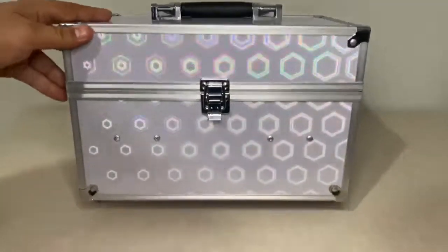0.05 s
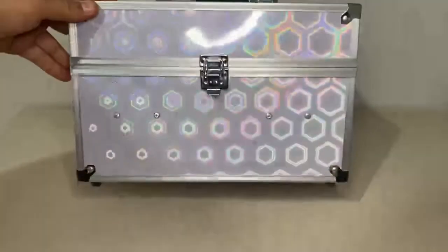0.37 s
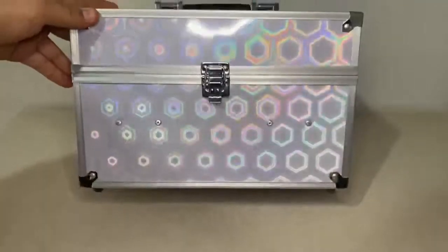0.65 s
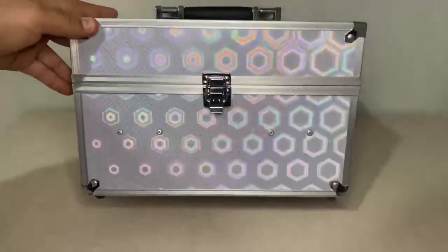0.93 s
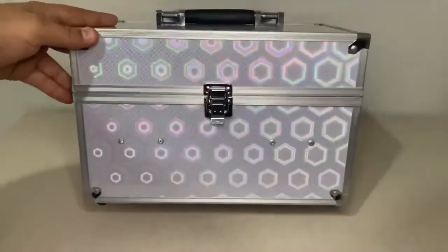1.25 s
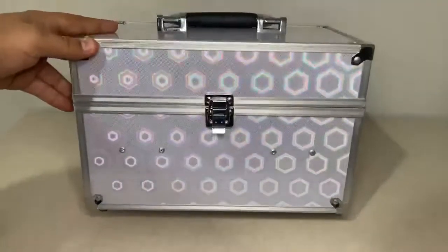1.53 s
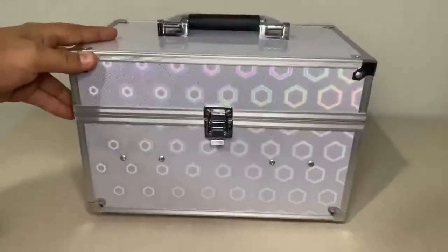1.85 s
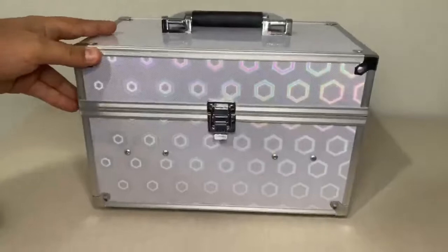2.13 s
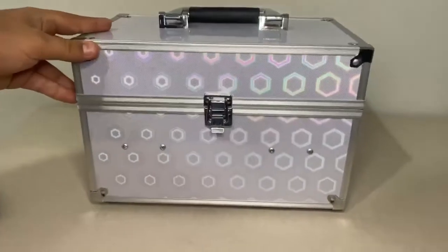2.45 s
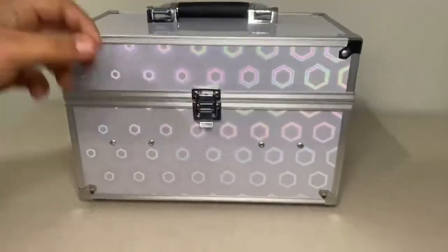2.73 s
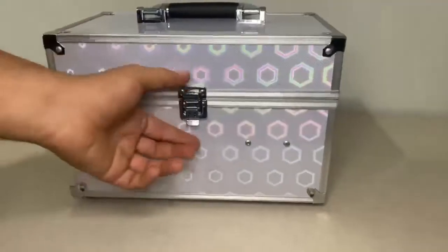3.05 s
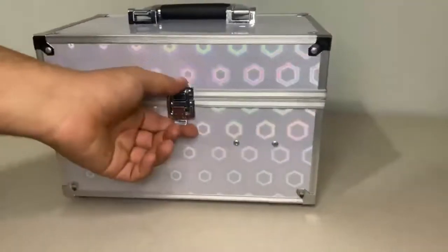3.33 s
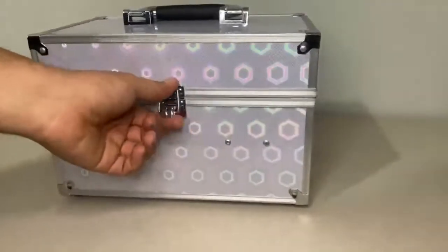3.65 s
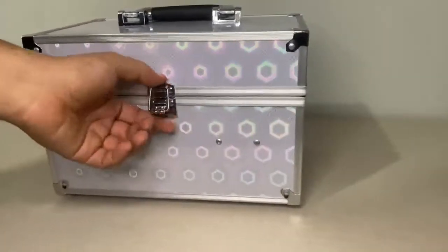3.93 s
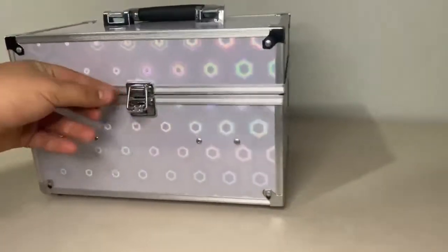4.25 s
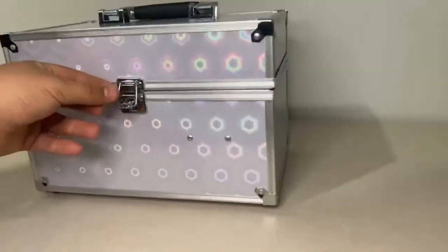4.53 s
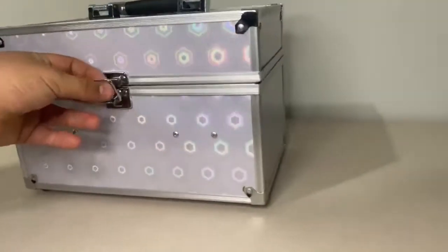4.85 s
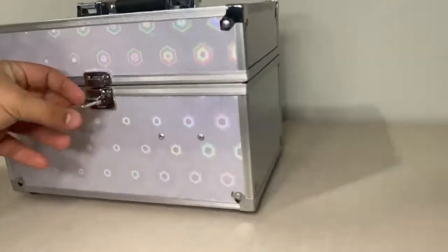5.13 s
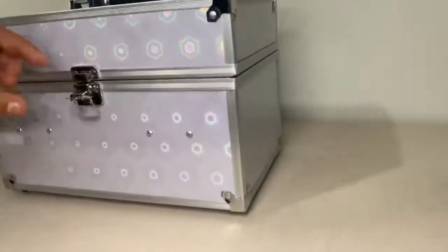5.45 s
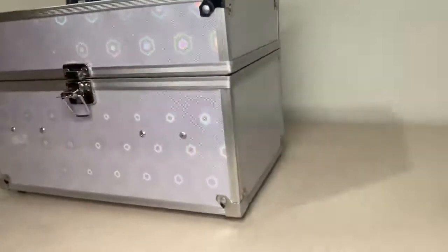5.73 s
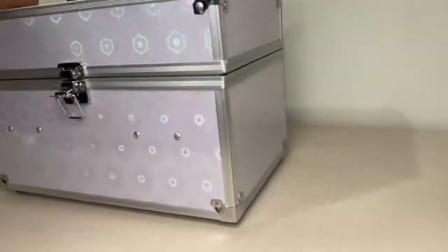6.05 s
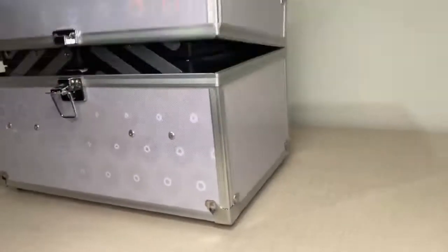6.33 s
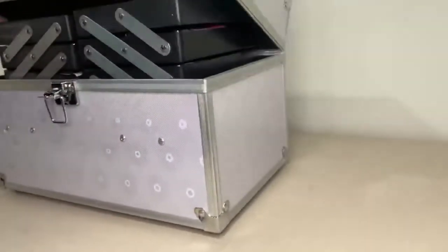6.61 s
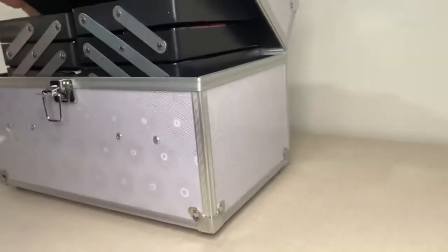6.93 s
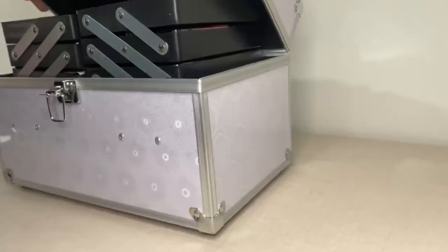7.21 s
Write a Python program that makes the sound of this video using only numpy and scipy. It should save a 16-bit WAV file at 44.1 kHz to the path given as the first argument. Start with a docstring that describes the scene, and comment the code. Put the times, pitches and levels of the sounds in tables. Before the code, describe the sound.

A metal-framed case thuds softly on a table, its steel clasp scrapes and snaps open, and the lid drags up.

```python
"""Opening a metal-framed case

In a small, quiet room an aluminium-framed case is tipped back onto a table with a hollow thud.
A hand rubs over it and pries up the steel clasp, whose hook grates, snaps free and chatters.
Then the lid drags up. Contacts ring the steel and the hollow box under it, and the walls echo.
A close pair of microphones listens, over a faint rumble and a low hum."""
import sys
import numpy as np
from scipy import signal
from scipy.fft import rfft, irfft, next_fast_len
from scipy.io import wavfile
from scipy.ndimage import uniform_filter1d

SR = 44100
rng = np.random.default_rng(int(sys.argv[2]) if len(sys.argv) > 2 else 0)


def persist_wave(psi):
    """Save psi, clipped to +-1, as 16-bit WAV."""
    counts = np.round(np.clip(psi, -1, 1) * 32767).astype(np.int16)
    wavfile.write(sys.argv[1], SR, np.atleast_2d(counts).T)


N = 320739
TREBLE_LIMIT_HZ = 11800


def amp(db):
    """Turns decibels into a gain to multiply by."""
    return 10 ** (np.asarray(db) / 20)


def evened(x):
    """Scales a signal to an average power of 1."""
    return x / np.sqrt(np.mean(x ** 2) + 1e-20)


def read(points, hz):
    """Looks up values between a table's rows, on a musical (log) pitch scale."""
    row_hz, value = np.transpose(points)
    return np.interp(np.log(hz + 1), np.log(row_hz + 1), value)


def add(mix, start_s, sound):
    """Mixes a sound in at its start time."""
    part = mix[:, round(start_s * SR):][:, :sound.shape[-1]]
    part += sound[..., :part.shape[1]]


def filtered(x, gain_at):
    """Turns each frequency up or down by its own gain."""
    size = next_fast_len(x.shape[-1], True)
    return irfft(rfft(x, size) * gain_at(np.fft.rfftfreq(size, 1 / SR)), size)[..., :x.shape[-1]]


def coloured(x, tone, tilt_db=0):
    """Gives white noise a tone at the same power; the tilt is in dB per octave above 400 Hz."""
    def gain_at(hz):
        db = read(tone, hz) + tilt_db * np.log2(np.maximum(hz, 400))
        return evened(amp(db) * (hz < TREBLE_LIMIT_HZ) * (hz > 20))
    return filtered(x, gain_at)


def hump(hz, centre_hz, width_oct):
    """A smooth hill of height 1 around one pitch."""
    return np.exp(-.5 * (np.log2((hz + 1) / centre_hz) / width_oct) ** 2)


def grit(size, per_s, spread_db, smooth):
    """Friction: many tiny slips of uneven size over a smooth hiss."""
    slips = (rng.random(size) < per_s / SR) * amp(spread_db * np.minimum(rng.exponential(1, size), 3.5))
    grains = evened(slips * rng.standard_normal((2, size)))
    return evened(grains + smooth * rng.standard_normal((2, size)))


def ring(notes, cutoff_hz=SR):
    """Struck notes fade 60 dB in their ring time, t60; a soft blow misses those above its cut-off."""
    t = np.arange(SR // 2) / SR
    return sum((-1) ** k * amp(db - 60 * t / t60) * np.sin(2 * np.pi * hz * t)
               / np.hypot(1, (hz / cutoff_hz) ** 3) for k, (hz, db, t60) in enumerate(notes))


def struck_spot(x, ripple_db):
    """Each place of contact favours some of the higher notes and misses others."""
    knots_hz = np.linspace(0, TREBLE_LIMIT_HZ, num=80)
    heights_db = ripple_db * rng.uniform(-2.2, 1, len(knots_hz)) * np.minimum(knots_hz / 3000, 1)
    return filtered(x, lambda hz: evened(amp(np.interp(hz, knots_hz, heights_db, right=0))))


def crack(tone, tilt_db, t60, apart, rise_s=0.00057, ripple_db=6.5):
    """A burst of crowded, quickly dying notes, partly different on the left and right."""
    t = np.arange(SR // 2) / SR
    shared, left, right = rng.choice([-1., 1.], (3, len(t)))
    noise = evened(shared + apart * np.array([left, right]))
    burst = noise * amp(-60 * t / t60) * (1 - np.exp(-t / rise_s))
    padded = np.pad(burst, ((0, 0), (len(t), 0)))
    return struck_spot(coloured(padded, tone, tilt_db), ripple_db)[:, len(t):]


def flicker(x, depth_db, full_from_hz=2400):
    """Narrow bands of pitch swell and fade at random, giving a faint watery flicker."""
    hz, _, bands = signal.stft(x, SR, nperseg=512)
    patches = rng.standard_normal(bands.shape[1:])
    for _ in range(2):
        patches = uniform_filter1d(uniform_filter1d(patches, size=4, axis=0), size=5, axis=1)
    gain = amp(depth_db * evened(patches) * np.minimum(hz / full_from_hz, 1)[:, None])
    gain /= np.sqrt(np.mean(gain ** 2, axis=1, keepdims=True))
    return signal.istft(bands * gain, SR)[1][:, :N]


def right_later(x, lag_s):
    """Direct sound reaches the right microphone a little later."""
    return np.array([x[0], filtered(x[1], lambda hz: np.exp(-2j * np.pi * hz * lag_s))])


# How alike left and right are in sound from all around: (frequency [Hz], likeness [0 to 1])
LIKENESS = [(40, 0.48), (150, 0.93), (300, 0.42), (600, 0), (1200, 0), (12000, 0.015)]

def diffuse(pair):
    """Long waves reach both microphones alike, so two unrelated noises come to share their bass."""
    mid = filtered(pair[0], lambda hz: np.sqrt(np.clip(1 + read(LIKENESS, hz), 0, 2) / 2))
    side = filtered(pair[1], lambda hz: np.sqrt(np.clip(1 - read(LIKENESS, hz), 0, 2) / 2))
    return np.array([mid + side, mid - side])


# Tone of the room's air, early and late: (frequency [Hz], relative level [dB])
EARLY_AIR_TONE = [(25, -12), (70, 0), (134, -12.5), (156, -19), (256, -10), (291, -20), (440, -17.5),
                  (513, -25), (883, -30), (2360, -40), (5250, -42), (12000, -60.5)]
LATE_AIR_TONE = [(25, -9), (50, 10.5), (80, -1.5), (150, -11), (300, -9.5), (500, -17), (1000, -24),
                 (2500, -24.5), (7000, -30.5), (12000, -46.5)]

def air():
    """Room rumble and faint hiss, thinning as the microphones move."""
    early = diffuse(coloured(rng.standard_normal((2, N)), EARLY_AIR_TONE))
    late = diffuse(coloured(rng.standard_normal((2, N)), LATE_AIR_TONE))
    moved = np.interp(np.arange(N) / SR, [3, 5.5], [0, 1])
    return amp(-60.5) * np.sqrt(1 - moved) * early + amp(-63) * np.sqrt(moved) * late


# The path of the hum: (time [s], pitch [Hz], level [dB])
HUM_PATH = [(3.202, 58, -64), (3.321, 59.1, -50.5), (3.42, 59.9, -50), (3.491, 59, -43.5),
            (3.55, 57.93, -61), (4.1, 52.7, -62), (5.001, 53.34, -61), (7.27, 52.45, -71)]

def hum():
    """A low, wavering hum comes and goes."""
    t = np.arange(N) / SR
    times, hz, db = np.transpose(HUM_PATH)
    waver = np.interp(t, np.linspace(0, t[-1], 60), rng.standard_normal(60))
    level = amp(np.interp(t, times, db, left=-100) + 0.71 * waver)
    return level * np.sin(2 * np.pi * np.cumsum(np.interp(t, times, hz)) / SR)


# How long the room rings: (frequency [Hz], ring time [s])
ECHO_TIMES = [(100, 0.95), (300, 0.12), (700, 0.59), (2000, 0.58), (4000, 0.55), (8000, 0.38),
              (12000, 0.32)]
# Tone of its echoes: (frequency [Hz], relative level [dB])
ECHO_TONE = [(80, -9), (250, -1), (700, -6), (2000, -3), (4200, -5.5), (7000, -6.5), (11000, -6.5)]

def reflections():
    """Dense echoes from table and walls, strongest early, each band dying at its own speed."""
    t = np.arange(SR) / SR
    echoes = diffuse(grit(SR, per_s=2500, spread_db=2.5, smooth=0.5))
    hz, age, bands = signal.stft(echoes, SR, nperseg=256)
    t60 = read(ECHO_TIMES, hz)[:, None]
    bands = bands * amp(read(ECHO_TONE, hz)[:, None] - 60 * age / t60)
    bands *= np.sqrt(2 * np.log(1000) / (t60 * SR))  # ringing longer adds no energy
    arrival = np.clip((t - .002) / 0.0016, 0, 1)
    early_boost = 1 + 0.58 * np.exp(-t / 0.022)
    return signal.istft(bands, SR, nperseg=256)[1][:, :SR] * arrival * early_boost


def room(x, count=3):
    """A few echo patterns take turns as the case and microphones move."""
    turn = np.pi * np.arange(N) / SR / 2.4
    shares = [np.cos(turn + np.pi * k / count) * np.sqrt(2 / count) for k in range(count)]
    return sum(signal.oaconvolve(x * share, reflections(), axes=1)[:, :N] for share in shares)


def tick(start_s=3.4584, decay_s=0.0015):
    """A thin, dry click with no echo."""
    out, t = np.zeros((2, N)), np.arange(SR // 20) / SR
    add(out, start_s, amp(-47) * np.exp(-t / decay_s))
    return out


# Small catches: (time [s], length [s], level [dB], pitch [Hz])
CATCHES = [(0.819, 0.12, -85, 4270), (1.529, 0.19, -79.5, 2900), (3.549, .008, -63, 6300),
           (3.57, 0.044, -60, 2750), (3.585, 0.0056, -59, 5100), (3.979, 0.083, -76, 2100),
           (4.811, 0.0088, -63.5, 3930), (5.078, 0.008, -58, 5850), (5.857, 0.0077, -70, 1006),
           (5.928, .014, -81, 7000), (5.987, 0.0074, -64.5, 3400), (6.188, .008, -69, 8050),
           (6.293, 0.029, -64.5, 3380), (6.405, 0.061, -77.5, 6800), (6.456, 0.0051, -67, 3460)]

def rasps():
    """Skin or a dry hinge catches: separate slips sound one broad band of pitch."""
    out = np.zeros((2, N))
    for start, length, db, centre_hz in CATCHES:
        size = round(length * SR)
        slips = grit(SR // 2, per_s=610, spread_db=3.0, smooth=.5)[0]
        rasp = filtered(slips, lambda hz: hump(hz, centre_hz, width_oct=0.27))
        add(out, start, amp(db) * evened(rasp[:size] * signal.windows.tukey(size, .6)))
    return out


# Tones of the shuddering box and of rubbing skin: (frequency [Hz], relative level [dB])
SHUDDER_TONE = [(30, -28), (80, -4.5), (150, -5), (260, -12.5), (450, -35), (1000, -61)]
RUB_TONE = [(120, -24.5), (350, 2.5), (720, 4.5), (1100, 0.5), (2000, -8.5), (3200, -11.5), (6000, -45)]

def friction(strokes, hiss_tone, uneven_db, press_s=0.025, let_go_s=0.024):
    """Skin and hinges stick and slip with a fine grain while the box shudders under the hand."""
    levels = np.zeros((3, N))
    for start, length, rub_db, hiss_db, shudder_db in strokes:
        t = np.arange(0, length, 1 / SR)
        pressure = np.minimum(t / press_s, 1) * np.minimum((length - t) / let_go_s, 1)
        add(levels, start, pressure * amp([[shudder_db], [rub_db], [hiss_db]]))
    shudder_level, rub_level, hiss_level = levels
    wobble = evened(uniform_filter1d(rng.standard_normal(N), size=500))
    grip = evened(amp(uneven_db * wobble))
    shudder = diffuse(coloured(rng.standard_normal((2, N)), SHUDDER_TONE))
    rub = coloured(grit(N, per_s=500, spread_db=1.5, smooth=0.86), RUB_TONE)
    hiss = coloured(grit(N, per_s=1200, spread_db=-2.4, smooth=0.85), hiss_tone)
    hiss = evened(hiss + .6 * hiss[::-1])  # both sides hear much the same slips
    sliding = amp(1.5) * rub_level * rub + amp(-3) * hiss_level * hiss
    return amp(1.5) * shudder_level * shudder + grip * flicker(sliding, depth_db=2.5)


# Slides and pulls, with relative levels: (time [s], length [s], rub [dB], hiss [dB], shudder [dB])
HAND_MOVES = [(1.5, 0.27, -77, -72, -78), (2.34, 0.26, -69, -70.5, -61.5), (2.39, .13, -74, -64, -93),
              (3.52, 0.1, -60.5, -59, -51.5), (3.62, 0.091, -79, -69, -58), (5.72, 0.092, -66, -71, -73),
              (5.84, 0.22, -66.5, -66, -73), (6.03, 0.213, -65.5, -63.5, -58),
              (6.22, 0.17, -62, -68.5, -66), (6.38, 0.095, -56, -59, -57.5),
              (6.47, 0.084, -55, -65.5, -58.5)]
# Tone of their fine hiss: (frequency [Hz], relative level [dB])
HAND_HISS_TONE = [(800, -8), (1800, 5), (3000, 9.5), (4800, 5.5), (6900, 1.5), (8500, -8.5), (12000, -19)]

def hand_on_case():
    """The hand slides on the case, then the lid drags up in a few pulls."""
    return amp(-2.5) * friction(HAND_MOVES, HAND_HISS_TONE, uneven_db=2)


# Light knocks: (time [s], level [dB], pitch [Hz], ring time [s], left over right [dB])
LIGHT_KNOCKS = [(2.416, -44, 1200, 0.0088, 13.5), (2.803, -44, 1200, 0.0072, 9),
                (2.848, -41.5, 2900, 0.0014, 4), (3.114, -51.5, 1110, 0.013, 10.5),
                (6.1895, -40.5, 1000, 0.0079, 10), (6.4555, -39, 974, 0.0081, 9),
                (6.9349, -36.5, 1480, 0.0044, 13.5), (6.935, -44.5, 4340, 0.003, -7),
                (6.9363, -34.5, 745, 0.016, 8)]

def taps():
    """Small dead knocks: a few cycles of one pitch and a faint tick."""
    out = np.zeros((2, N))
    for start, db, hz, t60, pan_db in LIGHT_KNOCKS:
        knock = ring([(hz, 0, t60)]) + amp(-20) * crack(RUB_TONE, tilt_db=1.1, t60=0.034, apart=0.17)
        add(out, start, amp(db) * amp([[pan_db / 2], [-pan_db / 2]]) * knock)
    return out


# Natural notes of the box and its panels: (pitch [Hz], relative level [dB], ring time [s])
BOX_NOTES = [(104, -9, 0.07), (119.6, -3, 0.21), (147.7, 2, 0.1), (164.1, 7, 0.077), (238, -1.5, 0.13),
             (280, -6, 0.11), (347, -3, 0.098), (444.5, -8.5, 0.32), (628, 1, 0.13), (765, 7.5, 0.028),
             (768, -14, 0.38), (1312, -10.5, 0.19)]
# Tone of the shaken frame: (frequency [Hz], relative level [dB])
RATTLE_TONE = [(120, -21.5), (350, 4.5), (720, 6), (1100, 0), (1800, -4), (2400, -16), (6000, -40.5)]
# Blows on the box: (time [s], level [dB], hardness as a cut-off [Hz], bounce [dB], rattle [dB])
SOFT_BLOWS = [(1.731, -35.5, 217, 6, -13.5), (2.849, -34, 211, -7, -28), (3.598, -39, 515, 3.5, -9.5),
              (3.61, -47.5, 380, -8, -24), (3.944, -52.5, 248, 3, -35), (4.67, -49, 650, 2.5, -27),
              (5.41, -50, 486.5, -14.5, -11.5), (6.196, -42, 217.6, 7.5, -16), (6.454, -48.5, 675, 5.5, -4)]

def thuds(feet_hz=72.3, rise_s=.003):
    """Soft blows boom in the box, bounce it on its feet and shake the frame."""
    out = np.zeros((2, N))
    give = 1 - np.exp(-np.arange(SR // 2) / SR / rise_s)  # rubber feet and flesh give way first
    bounce = ring([(feet_hz, 0, 0.22)]) - ring([(feet_hz, 0, .05)])  # builds over a cycle or two
    for start, db, hardness_hz, bounce_db, rattle_db in SOFT_BLOWS:
        boom = ring(BOX_NOTES, hardness_hz)
        rattle = crack(RATTLE_TONE, tilt_db=0, t60=0.25, apart=0.87, rise_s=rise_s)
        add(out, start, amp(db) * give * (boom + amp(bounce_db) * bounce + amp(rattle_db) * rattle))
    return out


# Natural notes of the free clasp and its wire hook: (pitch [Hz], relative level [dB], ring time [s])
CLASP_NOTES = [(1347, -9, 0.14), (2940, 0, 0.097), (3173, -2, 0.13), (3744, -9, 0.27), (4020, 2.5, 0.13),
               (4890, 3, 0.13), (6100, -13.5, 0.2), (6740, -1, 0.23), (8280, -4, .17), (9750, -15, 0.16),
               (10500, -14, .13)]

def held_clasp(x, ring_share=0.081):
    """A touch on the steel is heard bare and through the clasp's notes, cut short by the fingers."""
    t = np.arange(SR // 10) / SR
    held = [(hz, db - 3.5, t60 * ring_share) for hz, db, t60 in CLASP_NOTES]
    response = sum(amp(db - 60 * t / t60) * np.cos(2 * np.pi * hz * t) * 2 * np.log(1000) / (t60 * SR)
                   for hz, db, t60 in held)
    return x + signal.oaconvolve(x, response[None], axes=1)[:, :N]


# Prying moves, with relative levels: (time [s], length [s], rub [dB], hiss [dB], shudder [dB])
FINGER_MOVES = [(2.86, 0.22, -75.5, -76.5, -69.5), (3.92, 0.11, -84, -60.5, -62.5),
                (4.455, 0.07, -77, -51.5, -57), (4.615, 0.087, -57.5, -55, -55.5),
                (4.77, 0.11, -64.5, -75.5, -64), (4.9, 0.11, -63, -58.5, -75),
                (5.045, 0.12, -62.5, -59.5, -63), (5.235, 0.075, -66, -70, -61),
                (5.3, 0.13, -54.5, -56, -67)]
# Tone of skin on steel: (frequency [Hz], relative level [dB])
STEEL_HISS_TONE = [(1000, -4.5), (2500, -3.5), (4500, 6), (5500, 3), (7000, 7.5), (8500, 3.5),
                   (12000, -12.5)]

def fingers_on_clasp():
    """Fingers rub on the steel as they work at the clasp."""
    return amp(-0.5) * held_clasp(friction(FINGER_MOVES, STEEL_HISS_TONE, uneven_db=3))


# Tone of the grating hook: (frequency [Hz], relative level [dB])
GRATE_TONE = [(100, -6.5), (400, 9), (1500, 6), (2200, -0.5), (4500, 0.5), (7500, 1), (12000, -13.5)]
# Drags of the hook: (time [s], length [s], level [dB], brightness [dB per octave],
# left over right [dB], three peaks of the contact point (pitch [Hz], boost [dB]))
HOOK_DRAGS = [(3.561, 0.0397, -55, -3, -4, [(1300, 3), (4700, 9), (6800, 3)]),
              (3.778, 0.025, -55.5, 2, -9.5, [(2200, 13), (3600, 6), (5850, 8)]),
              (4.481, 0.014, -39.5, 0.5, -1.5, [(3500, 10), (4800, 8.5), (10700, 16)]),
              (4.4919, 0.011, -40.5, 0.2, -4.5, [(3200, 5), (3900, 2), (4900, 3)]),
              (4.506, 0.039, -53.5, 0, 9, [(2700, 0), (4400, 2), (9000, 3)]),
              (4.918, 0.037, -58.5, -0.2, 3, [(900, -6), (3850, -15), (6100, 1)]),
              (5.119, 0.031, -55.5, -3.4, -2, [(3900, 14), (5000, 11), (7300, 18)])]

def scrapes(swell_db_per_s=284.5):
    """The hook grates over its catch in a fast run of slips, louder as the force builds."""
    out = np.zeros((2, N))
    for start, length, db, tilt_db, pan_db, peaks in HOOK_DRAGS:
        slips = coloured(grit(SR // 2, per_s=5000, spread_db=0.8, smooth=0.38), GRATE_TONE, tilt_db)
        slips = slips + 0.29 * slips[::-1]  # each side hears a little of the other
        slips = filtered(slips, lambda hz: amp(sum(boost * hump(hz, pitch, width_oct=0.076)
                                                   for pitch, boost in peaks)))
        size = round(length * SR)
        force = signal.windows.tukey(size, .3) * amp(swell_db_per_s * np.arange(size) / SR)
        add(out, start, amp(db) * amp([[pan_db / 2], [-pan_db / 2]]) * evened(slips[:, :size] * force))
    return held_clasp(out)


PING_RING_S = 0.0099

def chatter(start_s=5.4171, gap_s=0.0073, pitch_hz=6995, loss_db=3.5):
    """The freed hook bounces on its plate, each bright ping weaker than the last."""
    out = np.zeros((2, N))
    for k in range(4):
        add(out, start_s + k * gap_s, ring([(pitch_hz, -28 - k * loss_db, PING_RING_S)]))
    return out


# Tone of steel hitting steel: (frequency [Hz], relative level [dB])
SNAP_TONE = [(100, -17.5), (350, 3), (750, 6), (1450, 1), (2400, 4), (3100, 3.5), (5200, 1), (7300, 0.5),
             (9500, -1.5), (12000, -14)]
# Snaps of the clasp: (time [s], level [dB], brightness [dB per octave], box ring [dB],
# clasp ring [dB], three pings of the contact point (pitch [Hz], relative level [dB]))
CLASP_SNAPS = [(3.803, -36.5, 0.5, -18.5, -39, [(2150, 2.5), (3250, -7), (5900, -5)]),
               (4.5379, -28, 1.1, -22, -35, [(3000, -9), (5200, -1), (6200, -3)]),
               (4.672, -56.5, -2, -20.5, -14.5, [(2300, 7), (4400, 12), (9500, 2)]),
               (4.944, -44, 0, -9.5, -21.5, [(2950, -4.5), (6100, 1.5), (7300, 6)]),
               (4.96, -52, -2.5, -16, -25, [(3850, -1.5), (5000, 3), (7400, 1)]),
               (5.102, -58.5, 3, -21, -23, [(3200, 1), (3900, -11), (4800, 12)]),
               (5.3052, -44.5, 2.5, -15.5, -13.5, [(3700, -4), (4900, -2), (7300, 1.5)]),
               (5.4036, -19.5, -0.5, -17, -24, [(2100, -8.5), (3400, 7), (4400, 9.5)]),
               (5.4075, -35.5, -2, -21.5, -23.5, [(750, 2.5), (3250, 15), (6900, 2)]),
               (5.4219, -36, -3.5, -25, -23, [(1400, 0.5), (3900, 5.5), (4600, 3.5)])]

def clicks(ripple_db, split_hz=250):
    """Steel snaps on steel: a crack, box and clasp ringing on, and pings set by where it strikes."""
    cracks, rings, pings = np.zeros((3, 2, N))
    box, hook = ring(BOX_NOTES), ring(CLASP_NOTES)
    for start, db, tilt_db, box_db, clasp_db, contact in CLASP_SNAPS:
        # each ping is a close pair of notes, so it swells and dies quickly
        ping = ring([(hz + side * split_hz, ping_db, PING_RING_S)
                     for hz, ping_db in contact for side in (-1, 1)])
        snap = crack(SNAP_TONE, tilt_db, t60=0.044, apart=0.93, ripple_db=ripple_db)
        add(cracks, start, amp(db) * snap)
        add(rings, start, amp(db + box_db) * box + amp(db + clasp_db) * hook)
        add(pings, start, amp(db) * ping * amp([[-1.5], [1]]))
    return held_clasp(cracks) + rings, pings


def scene():
    """All the contacts heard up close, then their echoes and the room's own background."""
    snaps, pings = clicks(ripple_db=6.5)  # uneven in tone, as heard from one direction
    grating, box, knocks = scrapes(), thuds(), taps()
    pings = pings + chatter()
    hand = hand_on_case() + rasps()
    fingers = fingers_on_clasp()
    # the walls get the snaps from all sides, more even in tone; the pings travel mostly forwards
    all_round, _ = clicks(ripple_db=3.0)
    echoes = room(all_round + grating + amp(-18.5) * pings + amp(-5.5) * box
                  + amp(-12.5) * knocks + hand + fingers)
    # the left microphone is nearer the clasp, and nearer still to the hand
    direct = right_later(snaps + grating + pings + box + fingers, lag_s=.00017)
    direct += right_later(hand + knocks, lag_s=0.000448)
    return direct + flicker(echoes, depth_db=3.5) + air() + hum() + tick()


def record(dry, tick_limit_hz=17000):
    """Cuts off the highest treble; only the thin tick reaches above the limit."""
    lowpass, tick_lowpass = (signal.firwin(511, hz, window=("kaiser", 9), fs=SR)
                             for hz in (TREBLE_LIMIT_HZ, tick_limit_hz))
    tick_top = signal.oaconvolve(tick(), (tick_lowpass - lowpass)[None], "same")
    return signal.oaconvolve(dry, lowpass[None], "same") + tick_top


dry = scene()
out = record(dry)
persist_wave(out)
```